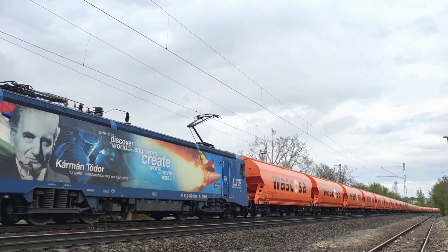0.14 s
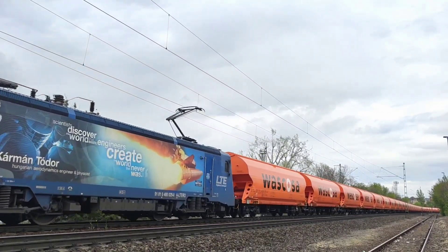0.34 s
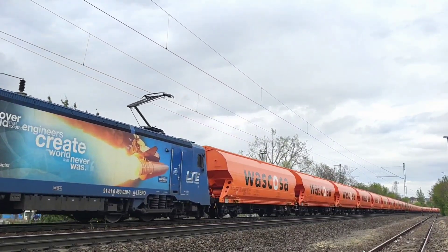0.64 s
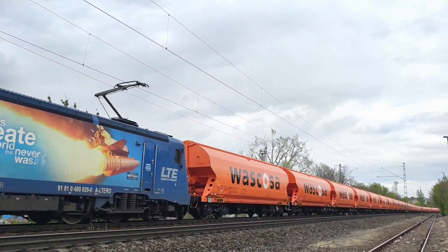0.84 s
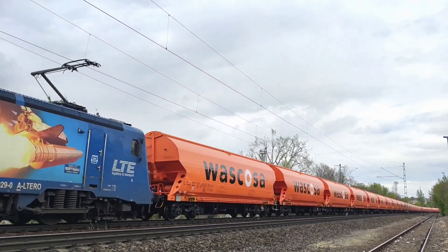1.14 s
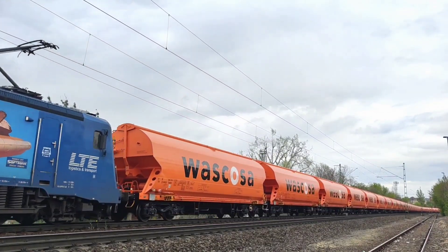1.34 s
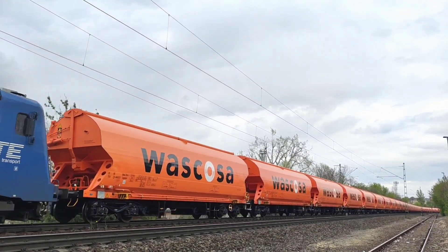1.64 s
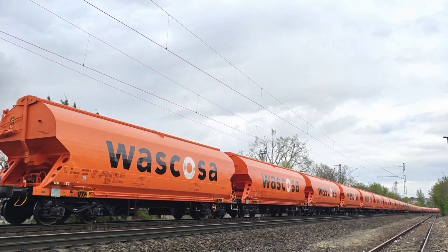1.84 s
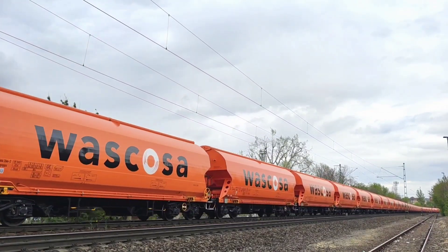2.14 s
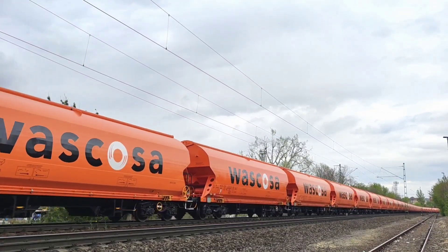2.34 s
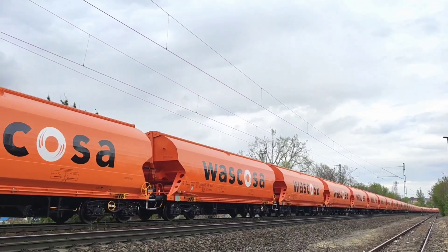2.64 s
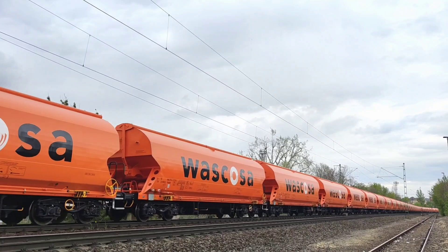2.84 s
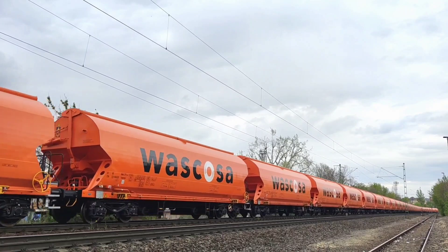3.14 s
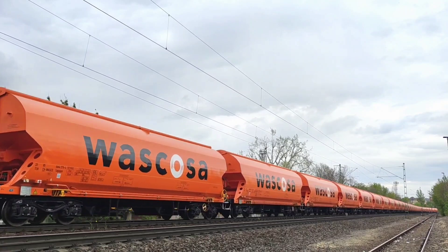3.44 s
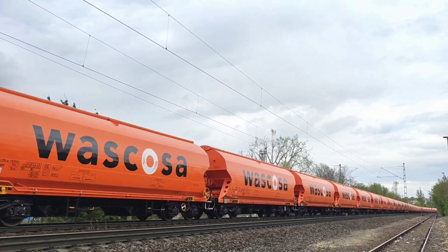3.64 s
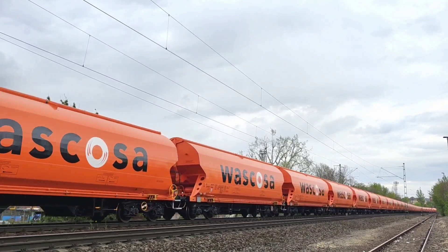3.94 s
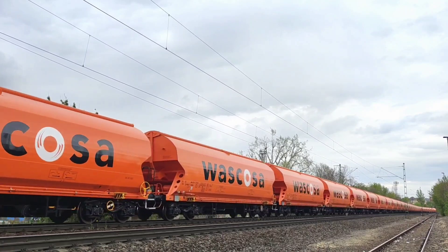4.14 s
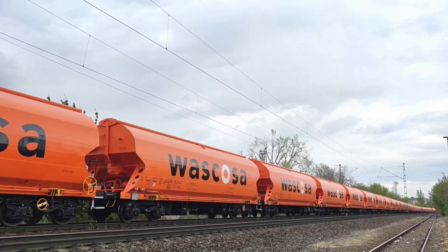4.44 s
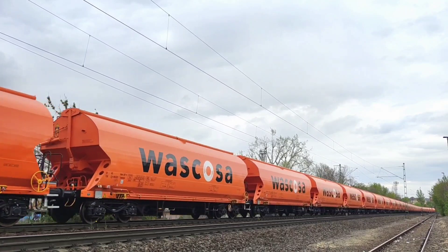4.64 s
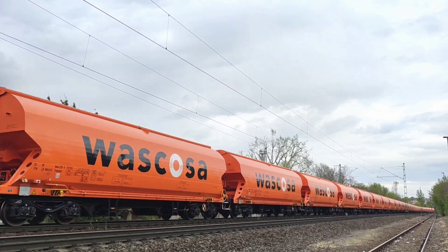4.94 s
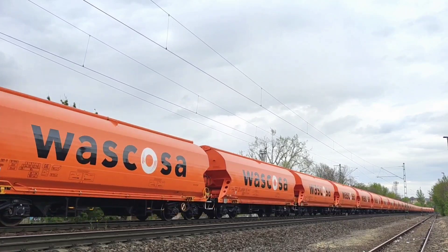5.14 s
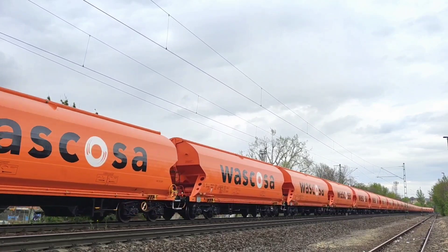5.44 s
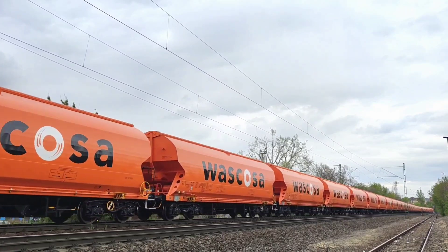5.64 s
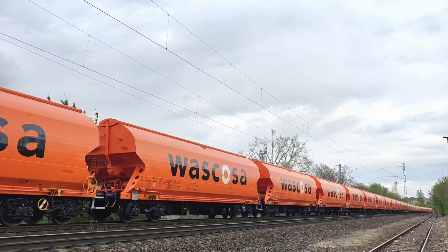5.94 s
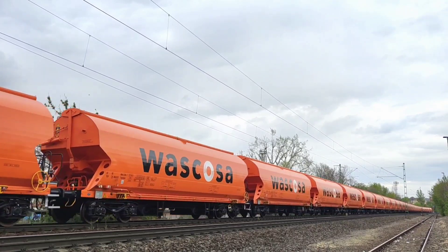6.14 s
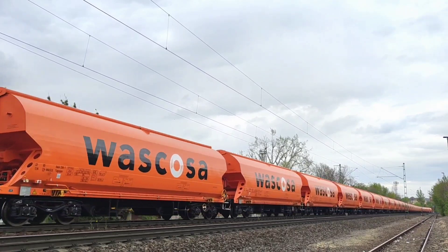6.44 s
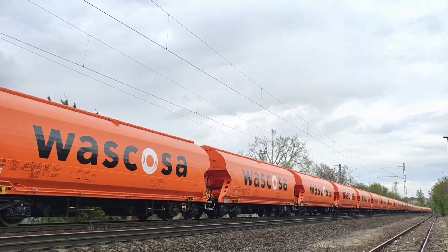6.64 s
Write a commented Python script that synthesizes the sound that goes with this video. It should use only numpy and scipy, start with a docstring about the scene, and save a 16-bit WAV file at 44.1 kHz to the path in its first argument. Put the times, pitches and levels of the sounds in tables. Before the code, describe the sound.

Close beside a railway line outdoors, an electric locomotive passes with heavy low rumble, rough wheel and rail noise, and motor and gear whine sinking in pitch. Thin flange squeals flicker around the loudest moment. The sound then settles into the quieter, steady droning roll of freight wagons, with a short squeak, a tiny rattle and a fainter squeak. A stationary stereo microphone catches low buffeting air.

```python
"""Beside a railway line, an electric locomotive passes a pair of microphone ports, hopper wagons behind it.
Roughness noise rings through bodies, rail and wheels; the locomotive's rings and whines sink in pitch as it goes by.
Flanges squeal as wavering sines; the quieter wagons take over with droning tones, two squeaks of sagging
tones with a noisy echo tail, and a rattle of bright noise ticks. Slipstream buffets the ports as low noise."""
import sys
import numpy as np
from scipy import signal
from scipy.fft import rfft, irfft, next_fast_len
from scipy.io import wavfile
from scipy.ndimage import map_coordinates

SR = 44100
rng = np.random.default_rng(int(sys.argv[2]) if len(sys.argv) > 2 else 0)


def generate_wav(signal):
    """Clip the signal to [-1, 1] and save it as 16-bit WAV at the path in sys.argv[1]."""
    frames = np.transpose(np.atleast_2d(signal))
    scaled = np.clip(frames, -1, 1) * 32767
    pcm = np.round(scaled).astype(np.int16)
    wavfile.write(sys.argv[1], SR, pcm)


N = 298998
TIME = np.arange(N) / SR
PAD = next_fast_len(N + SR // 2)   # working length of noise, longer than the scene
PREROLL_S = .25   # noise held ready before the scene starts, so that late sound is there from the outset

SPEED_M_S, TRACK_M, ABREAST_S = 10.5, 12.5, 2.25   # train speed, distance to track, loud bogie abreast
SOUND_M_S = 343
PORT_GAP_M, PORT_AIM_DEG = .175, 92   # the port axis points almost straight at the track, left port nearer
SHADE_DB = .5   # the ports shade each other: left gains as a source moves off
WAGON_DEG = -15   # bearing of the string of wagons
WHEELS_BEND = .5   # wheels and gears spread along the locomotive: their pitch sinks by this share only
TRAIL_SHARE = .3   # trailing bogies keep the sound near abreast after the loud one has gone by

# edges between body rumble, rail, wheels and hiss: (frequency [Hz])
RANGE_EDGES = [400, 1400, 5000]
# colour of the rolling noise, its shape within each range: (frequency [Hz], density [dB per Hz])
LOCO_COLOUR = [(20, -21), (42, -17.5), (90, -2.5), (220, 2), (330, -13.5), (460, -17), (760, -23.5),
               (1450, -26), (2100, -26), (2800, -32), (4200, -33), (6500, -31.5), (8000, -27), (9300, -37),
               (11500, -60), (14000, -54)]
WAGON_COLOUR = [(20, -10), (42, 2), (90, 3), (220, -5.5), (330, -14.5), (760, -28), (1450, -23.5),
                (2100, -14.5), (2800, -20), (4200, -27.5), (6500, -29.5), (8000, -25), (9300, -38.5),
                (14000, -56.5)]
# rings of the locomotive's body and wheels: (frequency when abreast [Hz], width [Hz], level over the noise [dB])
LOCO_RINGS = [(85, 20, 3.1), (125, 20, 3.1), (168, 16, 6), (243, 40, 5), (275, 40, 3), (315, 50, 2.5),
              (398, 26, 2), (592, 50, 6), (1000, 200, 3.1), (900, 60, 2.5), (1100, 60, 4.5), (1225, 60, 7),
              (1960, 90, 5), (2080, 100, 7.5), (2350, 60, 2.5), (2470, 70, 5.5), (2555, 60, 6.5),
              (3030, 100, 8), (3620, 110, 6), (4150, 120, 2.5), (4620, 200, 3), (4980, 80, 3.5),
              (5530, 120, 5), (6090, 90, 5), (6830, 50, 5), (7620, 220, 6), (9050, 400, 3), (11050, 150, 4)]
# rings of the wagons: (frequency [Hz], width [Hz], level over the noise [dB])
WAGON_RINGS = [(97, 37, 6.5), (131.2, 10.5, 8.5), (161.1, 15, 10), (224, 14, 13.5), (242.5, 7.9, 6),
               (359, 36, 8.5), (987, 20, 8.5), (1557, 28, 4.5), (1840, 140, 1.5), (1990, 90, -2),
               (2228, 59, 9), (2860, 600, 9.5), (3485, 160, 10), (3740, 200, 7.5), (4390, 550, 6.5),
               (5250, 530, 4), (6040, 200, 1.5)]
# hollows between the rings: (frequency [Hz], width [Hz], level [dB])
LOCO_HOLLOWS = [(1360, 170, -2.5), (2750, 150, -2), (3350, 230, -2), (4060, 150, -1), (4400, 130, -5.5),
                (5220, 150, -7), (5780, 180, -3.5)]
WAGON_HOLLOWS = [(2480, 180, -4), (3190, 160, -0.5), (3900, 150, -3), (4900, 180, -4.5), (5800, 250, -2),
                 (6640, 200, -0.5)]
# how alike the broad noise is at the two ports: (frequency [Hz], likeness [0-1])
LOCO_ALIKE = [(25, 0.7), (45, 0.8), (70, 0.99), (250, 0.97), (450, 0.69), (800, 0.59), (1300, 0.5),
              (2500, 0.23), (6000, 0), (9000, 0.11)]
WAGON_ALIKE = [(25, 0.87), (45, 0.87), (70, 1), (250, 0.89), (600, 0.43), (1300, 0.52), (2500, 0.28),
               (6000, 0), (9000, 0.04)]
# rolling noise, one row each for body rumble, rail, wheels, hiss; power falls as
# (track distance / distance) squared, to the beam power: (lateness [s], beam power [-], front bogie level [dB],
# rear bogie level [dB], first wagon level [dB], string of wagons level [dB])
RANGES = [(0.22, 2.43, -19.5, -22, -27.5, -31), (.001, 2.12, -32, -33, -43, -43),
          (.02, 1.65, -35.5, -34.5, -47.5, -44.5), (.001, 2.53, -43.5, -41, -49, -48)]
# loudest moments of the locomotive's front and rear bogie and of the first wagon, before lateness: (time [s])
BOGIE_TIMES = [1.3, 2.204, 3.2]
# low sound comes from a long stretch of track, so its port lag averages down; a row per range: (share of lag [0-1])
LAG_SHARES = [0.7, 0.9, 0.96, 1]
# the ports hear the locomotive more alike as it passes and draws away:
# (time [s], share of each port heard in the other [0-1])
FOCUS = [(0, 0), (1.6, .02), (2.4, .3), (3.6, .35), (4.6, .15), (6.78, .1)]
# whines carried along by the locomotive, before their waver: (time [s], level [dB])
MOTOR_LEVEL = [(0, -46.5), (.4, -38.5), (1.4, -36), (2.3, -36), (2.7, -48), (3.5, -48), (4.4, -49),
               (5.4, -63), (6.78, -66)]
GEAR_LEVEL = [(0, -52), (.2, -43), (.8, -45), (1.4, -39), (1.8, -42), (2.5, -38), (3, -40), (3.6, -43),
              (4.1, -46), (4.5, -55), (5.6, -66)]
CONVERTER_LEVEL = [(0, -66), (.5, -64), (.7, -58), (1.1, -61), (1.5, -57), (1.9, -58), (2.1, -54),
                   (2.5, -61), (3.5, -62), (3.8, -78), (6.78, -93)]
# flange squeals, before their waver: (middle [s], length [s], frequency [Hz], peak level [dB])
SQUEALS = [(1.15, .25, 2120, -38), (1.38, .16, 2100, -35), (.9, .3, 2600, -43), (1.42, .14, 3625, -39),
           (1.70, .12, 6130, -47), (1.68, .1, 3610, -43), (1.8, .3, 2570, -40), (4.3, .3, 2215, -46),
           (1.92, .16, 8350, -44), (1.94, .18, 6815, -41), (1.97, .3, 8440, -43), (2.20, .14, 7800, -44),
           (2.30, .24, 7548, -37), (2.31, .12, 6055, -48), (2.32, .12, 8360, -47), (2.35, .2, 6800, -46),
           (1.3, .22, 7570, -45), (1.5, .2, 7600, -44), (1.74, .2, 7480, -45), (2.1, .25, 7590, -44),
           (2.5, .16, 7530, -43), (2.66, .16, 7520, -45), (1.86, .16, 6800, -46), (1.88, .2, 6120, -48),
           (2.12, .2, 8420, -48)]
# hollow swells of the low rumble: (middle [s], length [s], low edge [Hz], high edge [Hz], level [dB])
BOOMS = [(.95, .4, 190, 300, -29.5), (1.4, 0.68, 206, 330, -29), (2.462, 0.95, 271, 334, -33),
         (2.725, 0.65, 203, 276, -22), (2.995, 0.17, 197, 280, -19), (3.284, 0.15, 147, 243, -22)]
# narrow tones of the wagon bodies: (frequency [Hz], level against their rumble [dB], phase wander [rad])
DRONE_TONES = [(165, -14, 1.6), (238, -10.5, 1.6)]
# wagon squeaks, before their roughness: (middle [s], length [s], start frequency [Hz], end frequency [Hz],
# peak level [dB], octave level against the tone [dB], echo tail level [dB], bearing [deg])
SQUEAKS = [(5.113, .09, 1490, 1450, -23.5, -22, -49, -50), (5.130, .035, 1490, 1460, -36, -3, -52, -80),
           (6.101, .05, 1460, 1420, -35.5, -30, -45, -80)]
# ticks of noise, levels before the bright filter: (time [s], peak level [dB], fall by 60 dB [s])
RATTLE_TICKS = [(5.702, -36, 0.06), (5.708, -40, 0.05), (5.718, -45, .06)]
# wind on the ports, before its gusts: (time [s], level [dB])
SLIPSTREAM_LEVEL = [(0, -61), (1.2, -58), (1.7, -37), (2.5, -48), (3.9, -44), (4.6, -65), (6.78, -66)]
# colour of each port: (frequency [Hz], width [Hz], level [dB])
LEFT_PORT = [(7900, 1200, 0.96)]
RIGHT_PORT = [(7960, 580, -36), (9360, 640, -13)]


def from_db(db):
    """Level in dB to amplitude."""
    return 10 ** (np.asarray(db) / 20)


def rms_one(x):
    """Scale to an RMS of one over all ports together."""
    return x / np.sqrt(np.mean(x ** 2) + 1e-20)


def curve(rows):
    """Join the (time, value) rows by straight lines."""
    s, values = np.transpose(rows)
    return np.interp(TIME, s, values)


def at_hz(points, hz):
    """Read a frequency curve, straight over log frequency."""
    point_hz, values = np.transpose(points)
    return np.interp(np.log(hz), np.log(point_hz), values)


def bells_db(bells, hz):
    """Sum of bell-shaped humps or hollows in dB."""
    return sum(db / (1 + (2 * (hz - centre_hz) / width_hz) ** 2) for centre_hz, width_hz, db in bells)


def bandpass(x, order, low_hz, high_hz):
    """Keep one band of a sound."""
    return signal.sosfilt(signal.butter(order, [low_hz, high_hz], "band", fs=SR, output="sos"), x)


def drift(rate, size=N):
    """Slow chance: a random value at each step, joined by straight lines; rate in steps per second, 60 at most."""
    steps = rng.standard_normal(round(size / SR * 60) + 2)
    return np.interp(np.arange(size) / SR * np.clip(rate, .1, 60), np.arange(len(steps)), steps)


def swell(middle_s, length_s):
    """A raised-cosine swell around a moment."""
    return np.cos(np.pi * np.clip((TIME - middle_s) / length_s, -.5, .5)) ** 2


def blend(shared, own, likeness):
    """Mix shared and separate noise at constant power; likeness 1 makes the ports identical."""
    return np.sqrt(likeness) * shared + np.sqrt(1 - likeness) * own


def port_lag_s(bearing):
    """The right port hears a source at this bearing (radians from abreast) later than the left."""
    return PORT_GAP_M / SOUND_M_S * np.sin(bearing + np.radians(PORT_AIM_DEG))


def two_ports(mono, bearing):
    """A point source reaches both ports alike, the right one late."""
    return np.array([mono, map_coordinates(mono, [(TIME - port_lag_s(bearing)) * SR], order=3)])


def hear(source, delay_s, bearing, lag_share=1, focus=0):
    """Read a two-port source late by its travel time; changing delay bends pitch, focus makes the ports more alike."""
    mix = np.interp(np.arange(PAD) / SR - PREROLL_S, TIME, focus * np.ones(N))
    source = (source + mix * source[::-1]) / np.sqrt(1 + mix + mix ** 2)
    delays = [delay_s, delay_s + lag_share * port_lag_s(bearing)]
    ports = [map_coordinates(port, [(TIME + PREROLL_S - late) * SR], order=3, mode="wrap")
             for port, late in zip(source, delays)]
    shade = from_db(SHADE_DB * np.sin(bearing) * np.array([[1], [-1]]))
    return shade * np.array(ports)


def loco_path(bend=1):
    """Travel time (scaled by bend) and bearing of the locomotive's loud bogie."""
    along = SPEED_M_S * (TIME - ABREAST_S)
    delay_s = bend * np.hypot(along, TRACK_M) / SOUND_M_S
    heard_along = along * np.where(along > 0, TRAIL_SHARE, 1)
    return delay_s, np.arctan2(heard_along, TRACK_M)


def range_levels():
    """Amplitudes of locomotive and wagons in each range: bogies beam sideways in passing, the string is steady."""
    levels = []
    for late, beam, *passing_db, string_db in RANGES:
        front, rear, first = [
            from_db(db) * (1 + (SPEED_M_S * (TIME - s - late) / TRACK_M) ** 2) ** (-beam / 2)
            for s, db in zip(BOGIE_TIMES, passing_db)]
        levels.append((np.hypot(front, rear), np.hypot(first, from_db(string_db))))
    return levels


def rolling_bands(colour, rings, hollows, alike, swell_db, swells_per_s, ring_spread):
    """Roughness noise through a vehicle's colour and rings, partly shared by the ports, cut into four ranges."""
    hz = np.maximum(np.arange(PAD // 2 + 1) * SR / PAD, 1)
    spectrum = from_db(at_hz(colour, hz) + bells_db(hollows, hz))
    shared, *own = rfft(rng.standard_normal((3, PAD))) * spectrum
    own = np.array(own)
    likeness = np.clip(at_hz(alike, hz), 0, 1)
    broad = blend(shared, own, likeness)
    # a ringing wheel is a smaller source than the whole vehicle, so its ports are more alike
    narrow = blend(shared, own, likeness ** ring_spread)
    rung = 0
    for ring in rings:   # each ring swells and fades on its own
        ringing = irfft(narrow * (from_db(bells_db([ring], hz)) - 1), PAD)
        rung = rung + from_db(swell_db * drift(swells_per_s, size=PAD)) * ringing
    ports = broad + rfft(rung)
    above = [1] + [1 / (1 + (edge / hz) ** 8) for edge in RANGE_EDGES] + [0]
    return [rms_one(irfft(ports * (low - high), PAD)) for low, high in zip(above, above[1:])]


def rolling(flutter_db, flutter_per_s):
    """Rough wheels on rough rail: locomotive and wagons add in each range, all fluttering together over uneven rail."""
    loco = rolling_bands(LOCO_COLOUR, LOCO_RINGS, LOCO_HOLLOWS, LOCO_ALIKE,
                         swell_db=2.0, swells_per_s=16, ring_spread=.3)
    wagons = rolling_bands(WAGON_COLOUR, WAGON_RINGS, WAGON_HOLLOWS, WAGON_ALIKE,
                           swell_db=2.5, swells_per_s=14, ring_spread=.6)
    uneven = drift(flutter_per_s)
    path, focus = loco_path(WHEELS_BEND), curve(FOCUS)
    out = 0
    for near, string, gains, depth_db, lag in zip(loco, wagons, range_levels(), flutter_db, LAG_SHARES):
        loco_gain, wagon_gain = gains
        passing = hear(near, *path, lag, focus)
        following = hear(string, 0, np.radians(WAGON_DEG), lag)
        out = out + from_db(depth_db * uneven) * (loco_gain * passing + wagon_gain * following)
    return out


def whine(level, centre_hz, width_hz, alike, waver_db, bend):
    """Machinery sings in one narrow, wavering noise band carried along by the locomotive."""
    hz = np.arange(PAD // 2 + 1) * SR / PAD
    shared, *own = rfft(rng.standard_normal((3, PAD))) / (1 + (2 * (hz - centre_hz) / width_hz) ** 2)
    band = rms_one(irfft(blend(shared, np.array(own), alike), PAD))
    # dividing by the root of the envelope holds it halfway between noise and a steady tone
    envelope = np.abs(signal.hilbert(band)) + .1
    band = rms_one(band / envelope ** .5)
    return from_db(curve(level) + waver_db * drift(9)) * hear(band, *loco_path(bend), focus=curve(FOCUS))


def motor_hum():
    """The motors sing in a low narrow band, nearly the same at both ports; pitch as when abreast."""
    return whine(MOTOR_LEVEL, centre_hz=593, width_hz=30, alike=.9, waver_db=2.0, bend=WHEELS_BEND)


def gear_whine():
    """Traction gears sing in a narrow middle band; pitch as when abreast."""
    return whine(GEAR_LEVEL, centre_hz=1624, width_hz=46, alike=.35, waver_db=2.9, bend=WHEELS_BEND)


def converter_whine():
    """The converter sings high up, its pitch sinking by the full passing shift; pitch as when abreast."""
    return whine(CONVERTER_LEVEL, centre_hz=9960, width_hz=80, alike=.4, waver_db=1.5, bend=1)


def squeals(waver_hz, waver_db):
    """A flange rubs the rail and one wheel mode sings, wavering a little."""
    bend = np.cumsum(waver_hz * drift(40.03)) / SR   # in cycles, common to all squeals
    tones = 0
    for s, length, hz, db in SQUEALS:
        tones = tones + from_db(db) * swell(s, length) * np.sin(2 * np.pi * (hz * TIME + bend))
    return two_ports(tones * from_db(waver_db * drift(48.56)), loco_path()[1])


def boom():
    """Bands of low noise swell around the passing of the bogies."""
    out = 0
    for middle_s, length_s, low_hz, high_hz, db in BOOMS:
        band = bandpass(rng.standard_normal(N), 2, low_hz, high_hz)
        out = out + from_db(db) * swell(middle_s, length_s) * rms_one(band)
    return two_ports(out, loco_path()[1])


def transformer_hum():
    """A slightly unsteady mains tone that follows the level of the body rumble."""
    hum_hz, hum_db = 48.6, -24   # peak level against the rumble, before its drift
    rumble = np.hypot(*range_levels()[0])
    unsteady = from_db(hum_db + 2.3 * drift(3.0))
    return rumble * unsteady * np.sin(2 * np.pi * hum_hz * TIME + .42 * drift(2.0))


def drone():
    """The wagon bodies hum at a few narrow, wandering pitches."""
    tones = 0
    for hz, db, wander in DRONE_TONES:
        tones = tones + from_db(db + 2.5 * drift(3)) * np.sin(2 * np.pi * hz * TIME + wander * drift(6))
    wagon_rumble = range_levels()[0][1]
    return two_ports(np.sqrt(2) * wagon_rumble * tones, np.radians(WAGON_DEG))


def squeaks():
    """Short, rough, sagging tones with their octave, and a narrow noisy echo tail that lingers, separate at each port."""
    tail_rise_s, tail_t60_s = .03, .4
    tail = rms_one(bandpass(rng.standard_normal((2, N)), 2, 1350, 1520))
    out = 0
    for s, length, start_hz, end_hz, db, octave_db, tail_db, bearing_deg in SQUEAKS:
        sagging_hz = np.interp(TIME, [s - length / 2, s + length / 2], [start_hz, end_hz])
        phase = 2 * np.pi * np.cumsum(sagging_hz) / SR
        rough = from_db(db + 2.5 * drift(60))
        voice = np.sin(phase) + from_db(octave_db) * np.sin(2 * phase)
        tone = rough * swell(s, length) ** 1.5 * voice
        rise = np.clip(1 + (TIME - s) / tail_rise_s, 0, 1)
        fall = from_db(-60 * np.clip(TIME - s, 0, 2) / tail_t60_s)
        out = out + two_ports(tone, np.radians(bearing_deg)) + from_db(tail_db) * rise * fall * tail
    return out


def rattle(low_hz, high_hz, rise_s):
    """Ticks of bright noise that die fast."""
    ticks = 0
    for s, db, t60 in RATTLE_TICKS:
        rise = np.clip(1 + (TIME - s) / rise_s, 0, 1)
        ticks = ticks + from_db(db - 60 * np.clip(TIME - s, 0, 1) / t60) * rise
    return bandpass(ticks * rng.standard_normal((2, N)), 4, low_hz, high_hz)


def slipstream(top_hz, gust_db):
    """Air dragged along by the train buffets each port on its own, in shared gusts."""
    low = bandpass(rng.standard_normal((2, N)), 2, 15, top_hz)
    return from_db(curve(SLIPSTREAM_LEVEL) + gust_db * drift(4.1)) * rms_one(low)


def scene():
    """All sources at the two ports."""
    train = rolling(flutter_db=[.3, .4, .43, .92], flutter_per_s=14)
    train = train + motor_hum() + gear_whine() + converter_whine()
    train = train + squeals(waver_hz=14, waver_db=3)
    train = train + boom() + transformer_hum() + drone()
    wagon_noises = squeaks() + rattle(low_hz=6500, high_hz=10000, rise_s=.003)
    return train + wagon_noises + slipstream(top_hz=55, gust_db=3.5)


def record(dry):
    """Each port has a colour of its own near 8 kHz; a steep low-pass cuts the top."""
    hz = np.arange(PAD // 2 + 1) * SR / PAD
    ports = from_db([bells_db(LEFT_PORT, hz), bells_db(RIGHT_PORT, hz)])
    coloured = irfft(rfft(dry, PAD) * ports, PAD)[:, :N]
    return signal.sosfilt(signal.ellip(12, .5, 70, 14180, fs=SR, output="sos"), coloured)


dry = scene()
out = record(dry)
generate_wav(out)
```